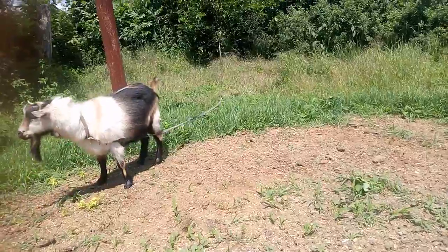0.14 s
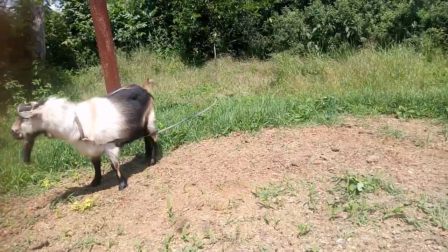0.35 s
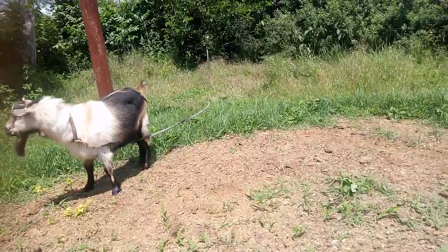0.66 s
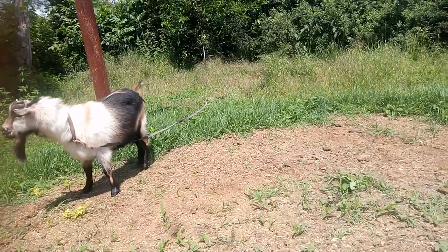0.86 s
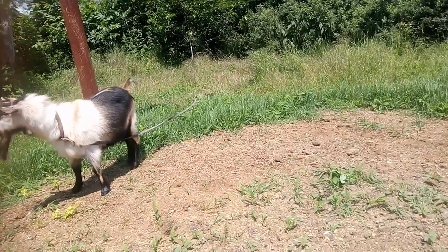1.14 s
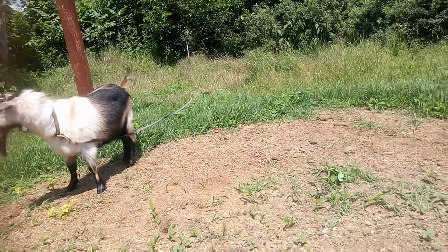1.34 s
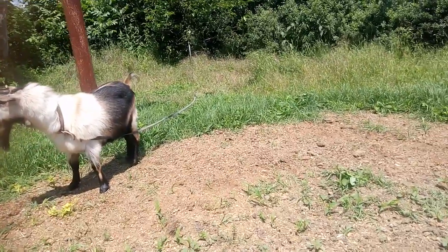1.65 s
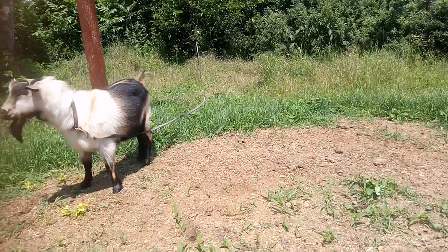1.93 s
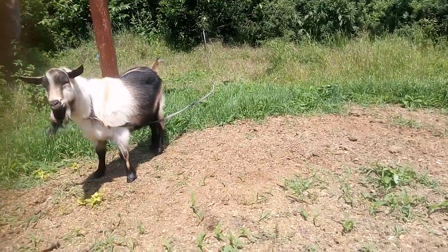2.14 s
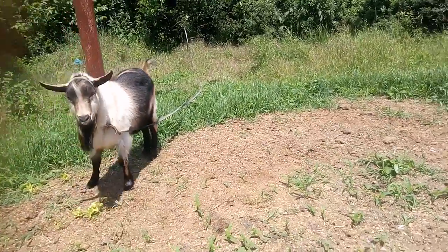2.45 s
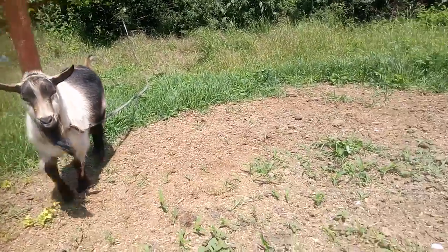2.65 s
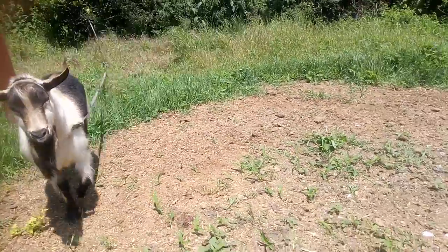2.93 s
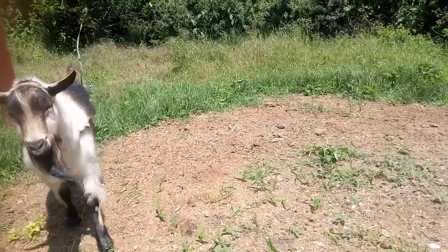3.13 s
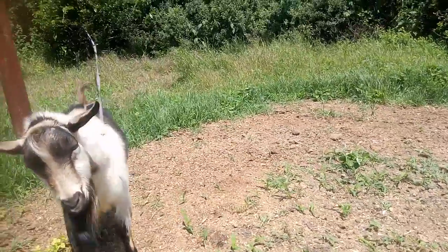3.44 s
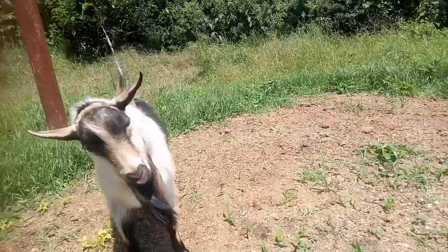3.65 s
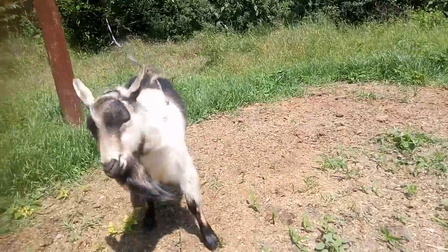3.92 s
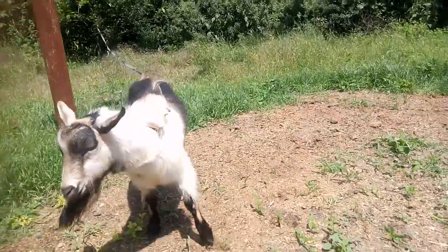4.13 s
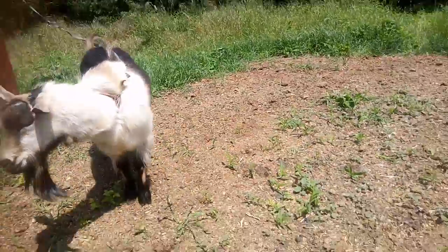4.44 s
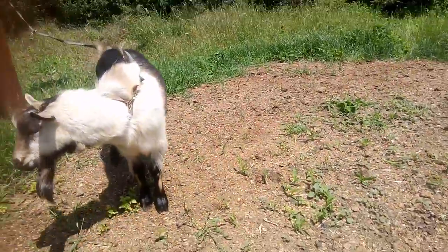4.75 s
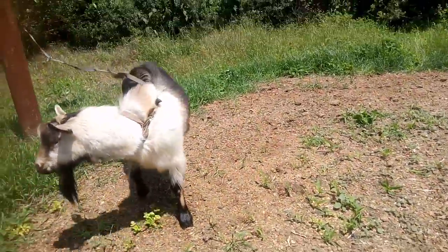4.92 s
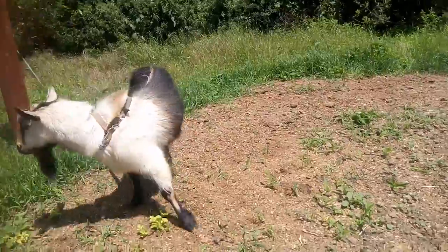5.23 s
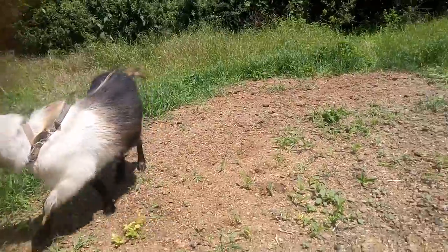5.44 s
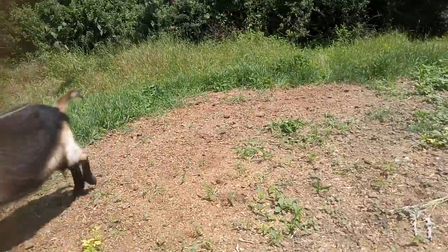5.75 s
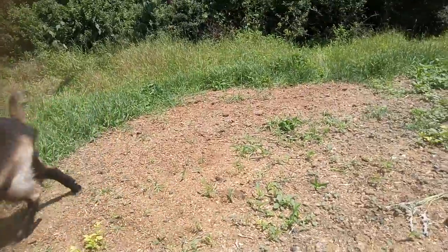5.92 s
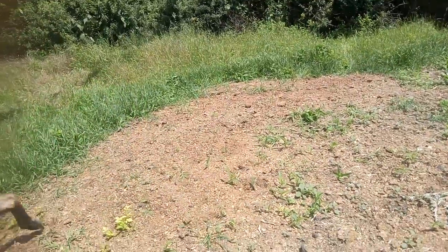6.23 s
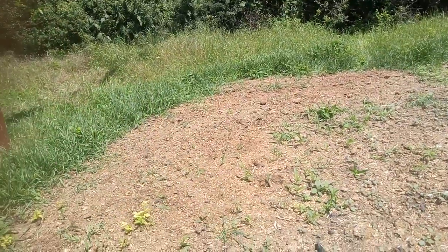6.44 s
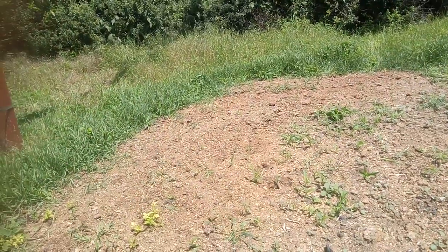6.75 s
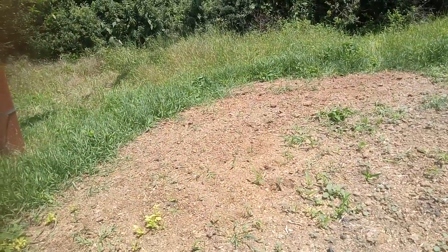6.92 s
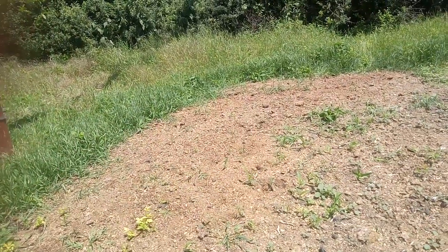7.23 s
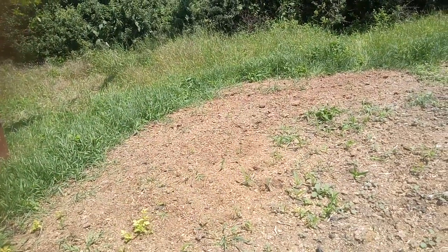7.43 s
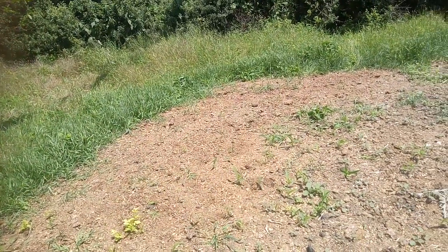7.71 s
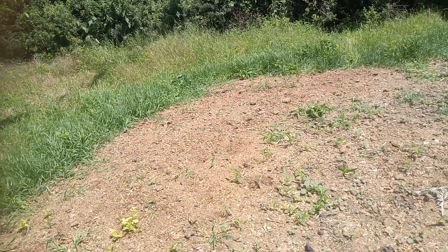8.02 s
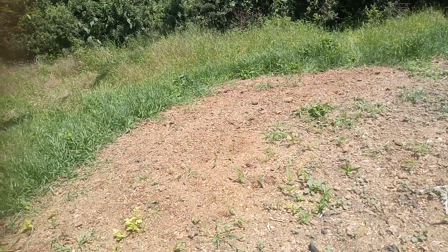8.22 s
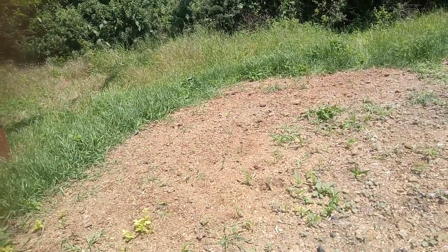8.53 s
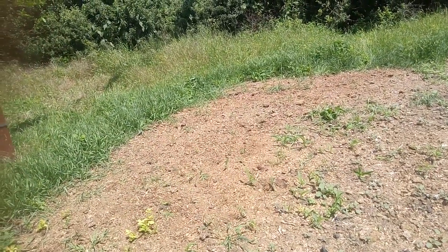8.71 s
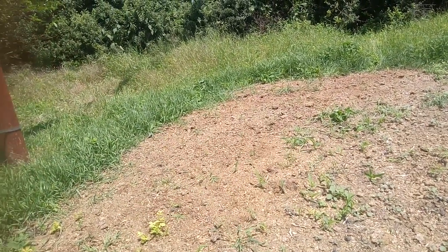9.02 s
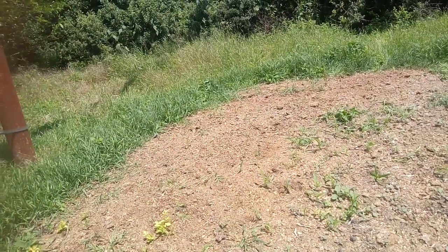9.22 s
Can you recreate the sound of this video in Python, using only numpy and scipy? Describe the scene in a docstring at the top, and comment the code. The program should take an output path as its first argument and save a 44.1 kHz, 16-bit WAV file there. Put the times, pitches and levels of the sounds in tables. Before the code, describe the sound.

A dense, raspy chatter of small birds runs throughout, mostly left, with quick trilled whistles over a faint far flock. Close by, also left, a goat shifts in dry grass: crackling rustle, sharp ticks, dull hoof scuffs and thuds, and soft closed-mouth hums. It gives two short throbbing bleats around the middle. The yard is open and quiet, with a faint thin insect tone, heard through a small, bass-light microphone.

```python
"""Tethered goat in a dry yard

A goat bleats twice, its voice made of pulses and breath sent through throat resonances,
with soft hums before the first bleat and at the end of the second.
Small birds chatter to the left: gliding, trilled whistles in front of a crowd of short far chirps.
Noise makes the hooves that scuff and thud and the dry grass that rustles; tether and stems tick, one part clinks.
A thin wavering tone, perhaps an insect, holds on over a quiet outdoor wash."""
import sys
import numpy as np
from scipy import signal
from scipy.fft import rfft, irfft
from scipy.io import wavfile
from scipy.ndimage import uniform_filter1d

SR = 44100
rng = np.random.default_rng(int(sys.argv[2]) if len(sys.argv) > 2 else 0)


def waveform_to_disk(signal):
    """Save audio, clipped to [-1, 1], as 16-bit WAV at the path in sys.argv[1]."""
    frames = np.transpose(np.atleast_2d(signal))
    scaled = np.clip(frames, -1, 1) * 32767
    samples = np.round(scaled).astype(np.int16)
    wavfile.write(sys.argv[1], SR, samples)


N = 413215  # length in samples

# Colour of dry grass and of the ticks. Each row: frequency in Hz, relative level in dB.
GRASS_COLOUR = [(500, -11.5), (1500, -3.5), (3500, 8.5), (6500, 5), (8200, -14), (10800, -8),
                (12200, -15.5), (13000, -58), (15000, -40)]
CHIRP_FADE_DB = -6  # a chirp weakens by this much along its length


def gain_of(db):
    """Decibels to an amplitude factor."""
    return 10 ** (np.asarray(db) / 20)


def evened(x):
    """Scales a sound to rms 1."""
    return x / np.sqrt(np.mean(x ** 2) + 1e-20)


def read(points, hz):
    """Reads a frequency curve, interpolated along log frequency."""
    f, value = np.transpose(points)
    return np.interp(np.log(hz + 1), np.log(f + 1), value)


def add(mix, s, sound):
    """Lays a sound into the mix at s seconds, cut at the end of the mix."""
    part = mix[..., round(s * SR):][..., :sound.shape[-1]]
    part += sound[..., :part.shape[-1]]


def wander(count, size):
    """Smooth chance of rms 1, changing over about size samples."""
    return evened(uniform_filter1d(uniform_filter1d(rng.standard_normal(count), size), size))


def resonate(x, hz, width):
    """Shifts the curve hz down to zero, smooths, and shifts back: a resonance of gain 1."""
    turn = np.exp(2j * np.pi * np.cumsum(hz * np.ones(len(x))) / SR)
    r = np.exp(-np.pi * width / SR)
    smooth = signal.lfilter([1 - r], [1, -r], x / turn + 1e-18)
    return 2 * (turn * smooth).real


def steep(x, hz, width):
    """Two equal resonances in a row, for steeper flanks."""
    return resonate(resonate(x, hz, width), hz, width)


def colour(x, points):
    """Filters a sound by a curve of Hz and dB."""
    gain = gain_of(read(points, np.fft.rfftfreq(x.shape[-1], 1 / SR)))
    return irfft(rfft(x) * gain, x.shape[-1])


def place(x, lean_db, lag=0):
    """Left louder by lean_db and shifted by lag samples, with the two gains averaging 1."""
    left = gain_of(lean_db)
    return np.array([left * np.roll(x, lag), x]) * 2 / (1 + left)


def echoes(x, t60):
    """Scattering from bushes: sparse taps of random sign that die away, others for each ear."""
    taps = np.zeros((2, SR // 2))
    jitter = rng.integers(0, 20, (2, (SR // 2 - 201) // 20))
    at = np.arange(200, SR // 2 - 20, 20) + jitter
    np.put_along_axis(taps, at, rng.choice([-1., 1.], at.shape), 1)
    taps *= gain_of(-60 * np.arange(SR // 2) / SR / t60)
    return signal.fftconvolve(x[None], taps / np.linalg.norm(taps[0]), axes=1)[:, :N]


def sweep(length, from_hz, to_hz, db, flutter_db, overtone_db):
    """A gliding whistle with a hoarse flutter and a faint or strong octave; it overhangs both ends by 0.3 length."""
    u = np.linspace(-.3, 1.3, round(1.6 * length * SR))
    # 42 swings a second, so longer whistles zigzag
    warble = rng.random() * np.sin(2 * np.pi * (42 * length * u + rng.random()))
    unsteady = .03 * warble + .011 * wander(len(u), size=60)
    hz = (from_hz + (to_hz - from_hz) * u) * (1 + unsteady)
    turns = 2 * np.pi * np.cumsum(hz) / SR
    tone = np.sin(turns) + gain_of(overtone_db) * np.sin(2 * turns)
    flutter = gain_of(db + flutter_db * wander(len(u), size=70))
    return flutter * tone * signal.windows.tukey(len(u), .7)


def crackle(per_s, spread_db):
    """Noise made lumpy by many small snaps of uneven size."""
    size = gain_of(spread_db * np.minimum(rng.exponential(1, N), 5))
    snaps = size * (rng.random(N) < per_s / SR)
    return rng.standard_normal(N) + 1.57 * evened(snaps * rng.choice([-1., 1.], N))


def strokes(rows, rise_s, sag_db, t60, rest_db):
    """Level of each stroke: it rises, sags while it lasts and dies away; the last line is the level at rest."""
    t = np.arange(N) / SR
    levels = []
    for s, length, db, *_ in rows:
        rise = -30 * np.clip((s + rise_s / 2 - t) / rise_s, 0, None)
        sag = sag_db * np.clip((t - s) / length, 0, 1)
        decay = -60 * np.clip(t - s - length, 0, None) / t60
        levels.append(db + rise + sag + decay)
    return np.array(levels + [rest_db + 0 * t])


def air():
    """Quiet outdoor wash: noise shaped in time and frequency, with drifting patches and a loosely tied stereo pair."""
    # Colour of the air. Each row: frequency in Hz, relative level in dB.
    air_colour = [(25, -29), (60, -7), (100, -3.5), (200, -5.5), (500, -7.5), (1000, -10), (1700, -10),
                  (3000, -5), (5000, -4.5), (6800, -18), (8000, -31), (11000, -29), (13500, -33.5),
                  (15000, -34)]
    # Width of the air. Each row: frequency in Hz, left-right likeness from 0 to 1.
    likeness = [(60, 0.36), (500, 0.26), (1000, 0.025), (2000, 0.058)]
    # Balance of the air. Each row: frequency in Hz, left over right in dB.
    balance = [(500, -1), (1000, -1), (1800, 12.5), (7000, 13.5), (12000, -1.5)]
    frames, hz = N // 256 + 5, np.fft.rfftfreq(1024, 1 / SR)
    a, b, c, d, patches = rng.standard_normal((frames, 513, 5)).T
    patches = evened(uniform_filter1d(uniform_filter1d(patches, 10, 0), 14, 1))
    same = np.clip(read(likeness, hz), -1, 1)[:, None]
    half_lean = gain_of(read(balance, hz)[:, None] / 2)
    left = a + 1j * b
    right = same * left + np.sqrt(1 - same ** 2) * (c + 1j * d)
    z = np.array([left * half_lean, right / half_lean])
    z *= gain_of(read(air_colour, hz)[:, None] + 2.8 * patches)
    wash = signal.istft(z, nperseg=1024, noverlap=768)[1][:, :N]
    return gain_of(-60.5) * evened(wash)


def insect():
    """A thin steady tone and its octave, wavering in level and very slightly in pitch."""
    hz = 5335 * (1 + .002 * wander(N, size=20000) + .002 * wander(N, size=300))
    turns = 2 * np.pi * np.cumsum(hz) / SR
    tone = gain_of(-76) * np.sin(turns) + gain_of(-97) * np.sin(2 * turns)
    return place(tone * gain_of(2.2 * wander(N, size=3000)), -1.5)


def line(u, from_hz, to_hz, zigzags):
    """Pitch along a chirp, u from 0 to 1: a straight glide with slow swings of 9 % of pitch."""
    return (from_hz + (to_hz - from_hz) * u) * (1 + .09 * np.sin(2 * np.pi * zigzags * u))


def chirp(length, from_hz, to_hz, db, zigzags):
    """A trilled whistle along its line, broken into short strokes, that flutters, with a faint octave."""
    edge_s, trill_per_s, pulses_per_s, pulse_db = 0.015, 30, 84.8, 3.5
    t = np.arange(0, length + edge_s, 1 / SR)
    trill = .025 * np.sin(2 * np.pi * trill_per_s * t) + 0.0084 * wander(len(t), size=60)  # shares of pitch
    hz = line(t / length, from_hz, to_hz, zigzags) * (1 + trill)
    turns = 2 * np.pi * np.cumsum(hz) / SR
    edges = np.sin(np.pi / 2 * np.clip(np.minimum(t, t[-1] - t) / edge_s, 0, 1)) ** 2
    level_db = db + CHIRP_FADE_DB * t / length
    level_db += 2.7 * wander(len(t), size=90) + 2.94 * wander(len(t), size=300)
    pace = pulses_per_s * rng.uniform(0.797, 1.174)  # each chirp pulses at its own pace
    level_db += pulse_db * np.sin(2 * np.pi * (pace * t + rng.random()))
    return gain_of(level_db) * edges * (np.sin(turns) + gain_of(-38) * np.sin(2 * turns))


def near_birds():
    """Every near chirp comes with short steep side chirps scattered around its pitch; thin whistles join in."""
    # The near birds, one row a gliding or zigzagging chirp. Each row: start in seconds, length in seconds,
    # from Hz, to Hz, level in dB, number of zigzags (upward first if positive).
    near_chirps = [(0.111, 0.1, 4050, 3425, -44.5, 2), (.1, 0.078, 5450, 5480, -61, 2),
                   (.18, 0.087, 5380, 5350, -56, -0.5), (0.199, .085, 3320, 2670, -52.5, 3),
                   (0.378, .018, 6180, 5960, -42, 1), (.395, 0.11, 5074, 3250, -42.5, 0),
                   (.48, .03, 7270, 6900, -62, -0.5), (.52, .04, 4850, 5100, -54, 0),
                   (0.547, .11, 3920, 3314, -46.5, 3.5), (0.579, 0.083, 2680, 2800, -54, 2),
                   (.885, 0.077, 4216, 3406, -48.5, 3), (0.931, 0.028, 6170, 5840, -59.5, 4),
                   (0.959, 0.049, 5300, 4160, -48.5, 0), (.965, 0.028, 2766, 2610, -49, 2),
                   (1.016, 0.055, 3500, 3310, -51.5, 1.5), (1.079, 0.079, 4820, 3350, -51, -2.5),
                   (1.135, 0.069, 3515, 3480, -44.5, 1), (1.15, 0.068, 3950, 2350, -53.5, 0.5),
                   (1.21, 0.036, 3900, 3060, -52, 0.5), (1.36, 0.049, 3800, 4240, -51, 0.5),
                   (1.395, 0.063, 3836, 3297, -45.5, 0), (1.43, 0.098, 2894, 2500, -55.5, 2.5),
                   (1.744, 0.083, 3790, 2700, -54, 0), (1.8, 0.051, 3554, 3520, -49, 1),
                   (1.87, 0.018, 2770, 2724, -48, -3), (1.952, 0.077, 4860, 3495, -47, -0.5),
                   (2.009, 0.077, 4020, 2500, -48, .5), (2.172, 0.062, 3940, 4344, -50, 1),
                   (2.2, 0.027, 2717, 2310, -50.5, -2), (2.23, 0.077, 3050, 2325, -50.5, 2),
                   (2.32, 0.036, 3940, 3730, -45, 1), (2.355, 0.068, 2650, 3450, -55, 1.5),
                   (2.457, 0.019, 5860, 6540, -45, 0.5), (2.476, 0.093, 5050, 3466, -40.5, 3),
                   (2.542, 0.1, 3900, 2600, -46, 1.5), (2.75, 0.038, 3600, 3400, -51, 1),
                   (2.867, 0.088, 6180, 5850, -53.5, 2), (2.865, 0.073, 3640, 3970, -57.5, -0.5),
                   (2.989, 0.034, 4900, 5400, -51, 0.5), (3.095, 0.065, 3464, 3450, -52, 0.5),
                   (3.17, 0.074, 3940, 2470, -52.5, 2), (3.388, .085, 3970, 3750, -48, 0),
                   (3.475, .05, 3200, 2600, -48, 0), (3.551, 0.026, 5190, 6140, -48.5, 1),
                   (3.575, 0.06, 5020, 4640, -43, 3), (3.579, 0.12, 3900, 2960, -50, 4),
                   (3.744, 0.05, 3386, 3200, -47.5, 1), (3.79, 0.062, 3000, 2520, -52, 1.5),
                   (3.881, 0.023, 3450, 3480, -51, 0.5), (3.909, .035, 3050, 4220, -44.5, 0.5),
                   (3.89, 0.051, 5560, 6670, -55, 2), (4.338, 0.042, 3150, 2575, -47, .5),
                   (4.465, .05, 3200, 3100, -47, .5), (4.52, .06, 3050, 2600, -49, .5),
                   (4.675, 0.034, 2700, 2150, -49, 1.5), (4.692, 0.099, 4460, 3780, -49, -0.5),
                   (4.738, .05, 2900, 2240, -47, 1.5), (4.796, 0.11, 4920, 2700, -53, 0),
                   (5.01, .055, 3600, 3070, -51, 2.5), (5.101, 0.077, 4670, 3200, -42, 2),
                   (5.15, 0.11, 3624, 2720, -47.5, 2), (5.35, .09, 3550, 2760, -58.5, -0.5),
                   (5.44, .1, 3500, 2634, -57, 1), (5.582, .1, 3600, 3126, -48, 3),
                   (5.691, 0.067, 4920, 3530, -46, 1.5), (5.735, 0.091, 3640, 3350, -45.5, 2.5),
                   (6.075, 0.023, 3800, 4300, -42, 1), (6.1, 0.028, 3690, 3485, -35.5, -1),
                   (6.145, .03, 3600, 3740, -41, -1), (6.44, 0.083, 4440, 3630, -46.5, 1.5),
                   (6.535, 0.1, 3860, 3150, -45, 1.5), (6.655, .03, 4910, 5130, -45.5, 0),
                   (6.684, 0.078, 3824, 3540, -47.5, 1), (6.771, 0.056, 4030, 2350, -51.5, 2),
                   (6.832, 0.028, 6200, 6150, -55, -1.5), (6.843, 0.048, 4500, 3580, -38.5, 1.5),
                   (6.874, 0.095, 3500, 2200, -48.5, 2), (7, 0.14, 4370, 4440, -46.5, 2),
                   (7.085, 0.054, 3365, 3930, -44, 0.5), (7.135, 0.042, 3990, 2390, -58, 0.5),
                   (7.222, 0.049, 4630, 3085, -44.5, 1), (7.261, 0.046, 3000, 3970, -42.5, 1),
                   (7.3, 0.026, 3900, 3090, -48, 1), (7.39, .035, 3010, 4220, -46, 1.5),
                   (7.422, .035, 4200, 2554, -44, 1.5), (7.455, 0.097, 3246, 3280, -47, 1.5),
                   (7.645, 0.076, 3776, 3755, -46.5, 2), (7.712, 0.044, 3290, 3240, -44.5, .5),
                   (7.755, 0.038, 3055, 2914, -51, 0.5), (7.775, 0.053, 5950, 5000, -63, -1),
                   (7.834, 0.099, 6230, 4500, -53.5, 2), (7.995, 0.067, 5014, 3770, -40.5, 3.5),
                   (8.05, 0.071, 3710, 2737, -42.5, 1), (8.195, .085, 3500, 3250, -45, 2.5),
                   (8.215, 0.042, 4500, 4710, -52, -1), (8.31, 0.12, 4270, 3740, -55, 1),
                   (8.478, 0.083, 3510, 2910, -45.5, 2.5), (8.52, .09, 3456, 2578, -51, 0),
                   (8.624, 0.047, 3680, 3530, -48, 0.5), (8.655, .05, 4650, 4700, -44, 2),
                   (8.7, 0.059, 4690, 4320, -44, 3), (8.745, 0.047, 3470, 3830, -44.5, 1),
                   (8.775, .09, 3010, 2370, -55.5, 1.5), (8.892, 0.044, 2590, 2190, -54, 0),
                   (8.956, 0.15, 4860, 4545, -44, 6), (8.967, .035, 3300, 3900, -47, 0),
                   (9.02, .035, 3250, 3850, -49, 0), (9.065, .055, 3300, 4000, -44, 0),
                   (9.115, 0.065, 3180, 3240, -51, 2.5), (9.17, 0.061, 3604, 3493, -47, 1),
                   (9.225, 0.047, 3500, 3190, -44, 0.5), (9.268, .03, 4700, 3220, -43.5, 0.5),
                   (9.328, 0.036, 3715, 3220, -45, 2.5), (9.345, 0.038, 6060, 6010, -47.5, 1)]
    # Thin steady whistles, probably other birds.
    # Each row: start in seconds, length in seconds, from Hz, to Hz, level in dB.
    whistles = [(.01, 0.078, 1980, 1940, -80), (0.087, 0.046, 4840, 4780, -59),
                (0.625, .04, 4800, 4660, -62), (3.06, 0.11, 4430, 4380, -64), (.2, .08, 1098, 1080, -71),
                (.62, 0.077, 1550, 1500, -67), (3.12, .06, 2180, 2150, -68), (7.63, 0.044, 1440, 1425, -58),
                (7.965, 0.065, 2423, 2326, -50.5), (8.187, 0.046, 1760, 1695, -60.5),
                (8.37, .04, 4840, 4710, -52.5), (8.443, 0.062, 2770, 2720, -58),
                (8.763, 0.047, 2820, 2756, -57.5), (8.916, .04, 4900, 4780, -56)]
    sides_per_s = 180
    near = np.zeros(N)
    for s, length, from_hz, to_hz, db, zigzags in near_chirps:
        add(near, s, chirp(length, from_hz, to_hz, db, zigzags))
        for along, high, fall, soft in rng.random((round(sides_per_s * length), 4)):
            hz = min(line(along, from_hz, to_hz, zigzags) * (.85 + .6 * high ** 1.5), 6300)
            side_db = db + CHIRP_FADE_DB * along - 4 - 9 * soft - 4 * high
            add(near, s + length * along, sweep(.012, hz, hz * (1.2 - .45 * fall), side_db, 1.5, -38))
    for s, length, from_hz, to_hz, db in whistles:
        add(near, max(s - .3 * length, 0), sweep(length, from_hz, to_hz, db, 1.1, -43))
    return near


def far_flock():
    """A crowd of 1500 short chirps at chance times and pitches, rising and falling together."""
    # Swell of the rest of the flock. Each row: time in seconds, level in dB.
    swell = [(0.0, -75), (0.39, -59.5), (0.88, -67), (1.04, -58.5), (1.46, -64.5), (1.9, -58),
             (2.77, -55.5), (3.23, -63.5), (3.73, -47.5), (3.97, -63), (4.2, -68), (4.49, -52),
             (5.37, -61.5), (5.97, -56.5), (6.26, -50.5), (7.25, -58), (8.82, -56.5), (9.37, -51.5)]
    far = np.zeros(N)
    for s, length, high, fall, soft in rng.random((1500, 5)):
        hz = 3792 * np.exp((high - .42) ** 3 + 0.66 * (high - .42))
        db = -22 * abs(high - .4) - 14 * soft
        add(far, s * N / SR, sweep(.008 + .02 * length, hz, hz * (1.2 - .48 * fall), db, 1.8, -40))
    swell_s, swell_db = np.transpose(swell)
    level_db = np.interp(np.arange(N) / SR, swell_s, swell_db)
    return gain_of(level_db) * evened(far)


def birds():
    """Near and far birds to the left, earlier and louder in the left ear, scattered by the bushes."""
    near, far = near_birds(), far_flock()
    direct = place(near + .55 * far, 10, lag=-16)
    scatter = gain_of(-3) * echoes(near, .13) + 1.07 * echoes(far, 0.19)
    return direct + scatter * gain_of([[4], [-5]])


def rustle():
    """Stems rub in a bright crackle close to the left side; the right gets a weaker, narrower band."""
    # Dry grass brushed. Each row: start in seconds, length in seconds, level in dB.
    brushes = [(.47, 0.17, -77), (1.625, 0.14, -46.5), (1.85, 0.081, -50.5), (1.98, 0.25, -60.5),
               (2.46, .24, -48.5), (2.755, 0.059, -47), (3.33, 0.31, -54.5), (3.82, 0.15, -51),
               (4.085, 0.11, -53.5), (4.27, 0.28, -46), (4.975, 0.29, -46.5), (5.5, 0.11, -46.5),
               (5.95, 0.21, -57), (6.14, 0.48, -46), (6.66, 0.073, -52), (6.82, 0.098, -46.5),
               (7.28, 0.3, -57), (7.99, .08, -53), (8.67, 0.059, -60), (9, 0.063, -59), (9.34, 0.064, -52)]
    levels = strokes(brushes, rise_s=0.062, sag_db=-4.5, t60=0.47, rest_db=-83)  # rest: grass at rest
    lumps_db = 2.2 * wander(N, size=400) + 1.6 * wander(N, size=2500)
    left, right = (evened(colour(crackle(2500, 2.2), GRASS_COLOUR)) for _ in range(2))
    sides = np.array([left, gain_of(-12.5) * steep(right, 5200, 4600)])
    return gain_of(levels.max(axis=0) + lumps_db) * sides


def scuff():
    """Lumpy low noise, part of it ringing in a narrow hollow that murmurs; the loudest drag sets the hollow."""
    # Hooves dragging on dirt. Each row: start in seconds, length in seconds, level in dB, hollow in Hz.
    drags = [(0, 0.42, -71.5, 610), (1.2, 0.35, -72.5, 440), (1.625, 0.24, -65.5, 382),
             (1.935, 0.38, -66.5, 410), (2.503, 0.074, -65, 527), (2.768, 0.062, -61.5, 540),
             (3.401, 0.13, -65, 564), (3.602, 0.24, -58.5, 398), (3.822, 0.25, -65, 513),
             (4.458, 0.14, -67, 600), (4.988, 0.43, -69.5, 507), (5.511, .11, -57.5, 396),
             (6.105, 0.11, -65, 617), (6.473, 0.24, -56.5, 396), (6.677, 0.15, -65, 462),
             (7.302, 0.32, -76.5, 430)]
    # rest: weight shifting between drags
    levels = strokes(drags, rise_s=0.068, sag_db=-7.5, t60=0.44, rest_db=-85.5)
    loudest = levels[:-1].argmax(axis=0)
    hollow_hz = uniform_filter1d(np.transpose(drags)[3][loudest], size=2000)
    hollow = evened(steep(rng.standard_normal(N), hollow_hz, 130))
    # one grit shared by both sides, then one for each
    grit = [evened(steep(crackle(600, 2.9), 580, 1320)) for _ in range(3)]
    level = gain_of(levels.max(axis=0) + 1.6 * wander(N, size=600))
    drag = level * (0.5 * hollow + .5 * grit[0] + 1.15 * np.array(grit[1:]))
    return signal.sosfilt(signal.butter(2, 130, "high", fs=SR, output="sos"), drag)


def ticks():
    """Tether and stems tick: a few milliseconds of bright dying noise on a small low pop."""
    # Each row: start in seconds, level in dB before a 5 dB cut, left over right in dB (snap only),
    # pop against snap in dB.
    tick_rows = [(1.6387, -39, 17.5, -25), (1.6534, -37, 15.5, -23), (1.7344, -40, 7.5, -23),
                 (2.4688, -35, 10.0, -36), (2.6289, -31, 9.5, -37), (2.6469, -34, 12.5, -34),
                 (2.6614, -39, 10.5, -31), (2.7704, -39, 12.5, -22), (2.9692, -33, 15.0, -31),
                 (2.9876, -41, 15.5, -25), (3.4965, -38, 10.0, -17), (3.9264, -36, 11.5, -27),
                 (4.0248, -43, 12.0, -21), (4.3084, -34, 9.5, -17), (4.9954, -39, 12.0, -25),
                 (5.0664, -40, 13.0, -25), (5.2114, -37, 12.5, -28), (5.2494, -37, 13.0, -29),
                 (6.1404, -32, 12.5, -22)]
    out, t = np.zeros((2, N)), np.arange(4000) / SR
    for s, db, lean_db, low_db in tick_rows:
        snap = colour(rng.standard_normal(len(t)), GRASS_COLOUR) * gain_of(-60 * t / .007)
        pop = gain_of(low_db) * np.sin(2 * np.pi * 650 * t) * gain_of(-60 * t / .02)
        add(out, s, gain_of(db - 5) * (place(snap / abs(snap).max(), lean_db) + pop))
    return out


def thuds():
    """Hooves fall on the dirt: a damped low swing with a puff of grit."""
    # Each row: start in seconds, level in dB, pitch in Hz, left over right in dB, t60 of the swing in seconds.
    hoof_falls = [(1.668, -57.5, 268, 0.0, 0.11), (2.537, -52.5, 531, 0.0, 0.034),
                  (2.771, -56, 300, -2, 0.04), (3.494, -48, 613, -3, 0.027), (5.532, -51.5, 274, 0.0, 0.11),
                  (5.974, -56, 159, 3, 0.13), (6.136, -50.5, 800, -15, 0.024), (6.62, -50, 171, -3, 0.09),
                  (8.636, -46.5, 196.6, 21, 0.06)]
    out, t = np.zeros((2, N)), np.arange(4000) / SR
    for s, db, hz, lean_db, t60 in hoof_falls:
        swing = np.sin(2 * np.pi * hz * t) * gain_of(-60 * t / t60)
        puff = evened(steep(rng.standard_normal(len(t)), 1.1 * hz, 460)) * gain_of(-60 * t / 0.11)
        soft_start = 1 - np.exp(-t / 0.0013)
        add(out, s, place(gain_of(db) * (swing + 0.39 * puff) * soft_start, lean_db))
    return out


def clink():
    """A small metal part of the tether clinks once: a few high modes, struck lightly."""
    # Modes of the metal part. Each row: frequency in Hz, relative level in dB, t60 in seconds.
    modes = [(7400, -2, .12), (12150, 0, .14), (13300, -6, .1)]
    out, t = np.zeros(N), np.arange(8000) / SR
    ring = sum(gain_of(db - 60 * t / t60) * np.sin(2 * np.pi * hz * t) for hz, db, t60 in modes)
    add(out, 3.828, gain_of(-60) * ring * (1 - np.exp(-t / .003)))
    return place(out, 8)


def murmurs():
    """Soft hummed glides with a strong octave."""
    # Low voiced murmurs, probably the goat with its mouth shut.
    # Each row: start in seconds, length in seconds, from Hz, to Hz, level in dB.
    hums = [(1.945, 0.08, 359, 431, -64.5), (2.09, .1, 410, 437, -75), (3.645, 0.095, 364, 380.4, -62),
            (3.735, 0.055, 344.4, 364, -60), (3.8, .07, 493, 540, -68), (3.985, 0.1, 418, 444, -67),
            (6.53, 0.068, 361.4, 388, -65)]
    out = np.zeros(N)
    for s, length, from_hz, to_hz, db in hums:
        add(out, s - .3 * length, sweep(length, from_hz, to_hz, db, 0.68, -7.5))
    return place(out, .3)


def bleat(rows, scoop):
    """Pulses through the throat; between throbs the folds slacken, so level and pitch sag and breath shows."""
    # Upper throat resonances. Each row: frequency in Hz, width in Hz, relative level in dB.
    throat = [(2820, 850, 4.4), (4240, 660, 6), (4860, 710, 3), (6480, 1700, -12)]
    s, *columns = np.transpose(rows)
    t = np.arange(s[0], s[-1], 1 / SR)
    peak_db, hz, low_hz, bright_db, breathy = (np.interp(t, s, c) for c in columns)
    throbs = np.interp(t, s, np.arange(len(s)))
    slack = np.sin(np.pi * throbs) ** 4  # 0 on a throb, 1 midway between two
    bend = scoop * (np.sin(2 * np.pi * throbs) + .4 - slack)
    hz = hz * (1 + bend + .0035 * wander(len(t), size=90))
    turns = np.cumsum(hz) / SR
    # the fundamental is not radiated
    folds = evened(sum(np.cos(2 * np.pi * k * turns) for k in range(2, 24)))
    puffs = 0.22 + np.exp(-(turns % 1) / 0.24)  # breath bursts with every pulse
    breath = evened(puffs * rng.standard_normal(len(t)))
    breathy = np.clip(breathy, 0, 1)
    # the last share of breath does not sag with the folds
    drive = gain_of(-14 * slack) * ((1 - breathy) * folds + .45 * breathy * breath) + .09 * breath
    upper = sum((-1) ** k * gain_of(db) * steep(drive, f, w) for k, (f, w, db) in enumerate(throat))
    voice = steep(drive, low_hz, 452) - gain_of(bright_db - 3.8 * slack) * upper
    return s[0], gain_of(peak_db) * voice * signal.windows.tukey(len(t), .08)


def goat():
    """Close, to the left: its treble reaches the right side shaded. A short scatter follows."""
    # One table a bleat, one row a throb, silent at both ends. Each row: time in seconds, level in dB,
    # pitch in Hz before scoop and waver, first throat resonance in Hz, brightness in dB, breath from 0 to 1.
    bleat_tables = [
        [(4.19, -42, 477.6, 1040, 10.5, 0.34), (4.245, -34.5, 496, 1030, -6, 0.53),
         (4.338, -33.5, 500, 1078, -9, .4), (4.415, -33, 503, 1016, -11, 0.44),
         (4.52, -32.5, 512.4, 1000, -6.5, 0.32), (4.62, -33.5, 503.3, 986, -8, 0.26),
         (4.695, -33.5, 500.4, 1010, -5.5, 0.39), (4.738, -33.5, 502.6, 997, -4, 0.6),
         (4.81, -36.5, 473, 1000, -6, 0.84), (4.86, -54, 465, 950, -11, 1)],
        [(5.945, -55, 475.8, 970, 15, 0.25), (6.005, -33, 496.3, 940, -2, 0.43),
         (6.085, -34, 466, 1230, 1, 0.46), (6.18, -35.5, 468, 1230, -0.5, 0.23), (6.283, -35, 475, 1250, -1, 0),
         (6.372, -31, 471, 1284, 0, 0), (6.45, -32, 452, 1086, 2.5, 0.79), (6.51, -34, 457, 945, -8, 0.91)],
    ]
    # Upward scoop of every throb as a share of pitch, one value a bleat.
    scoops = [.021, 0.0077]
    voice = np.zeros(N)
    for rows, scoop in zip(bleat_tables, scoops):
        add(voice, *bleat(rows, scoop))
    scatter = gain_of(-11) * echoes(voice, .15)
    shaded = colour(voice, [(1000, -3.5), (1800, -15.5), (3500, -10.5)])  # (Hz, dB)
    return np.array([np.roll(voice, -3), shaded]) + scatter


def scene():
    """The whole yard, summed from the background to the goat."""
    background = air() + insect() + birds()
    ground = rustle() + scuff() + ticks() + thuds() + clink()
    return background + ground + murmurs() + goat()


def record(dry):
    """A small microphone that loses the deep bass, then the band limit at 15.1 kHz."""
    thin = signal.sosfilt(signal.butter(2, 60, "high", fs=SR, output="sos"), dry)
    band_limit = signal.firwin(511, 15100, window=("kaiser", 9), fs=SR)
    return signal.oaconvolve(thin, band_limit[None], "same")


dry = scene()
out = record(dry)
waveform_to_disk(out)
```